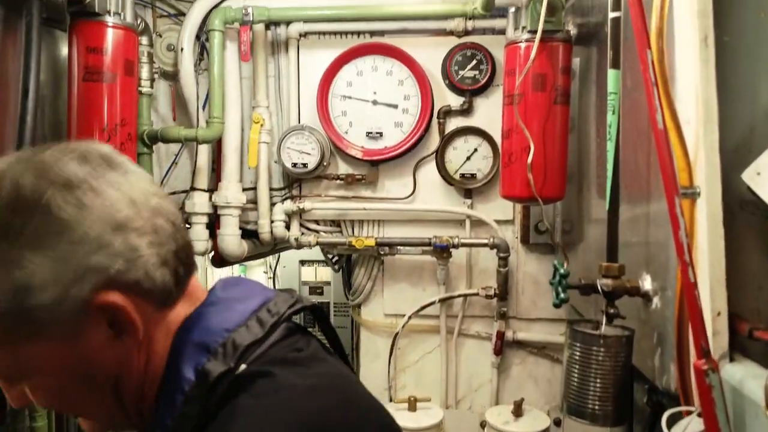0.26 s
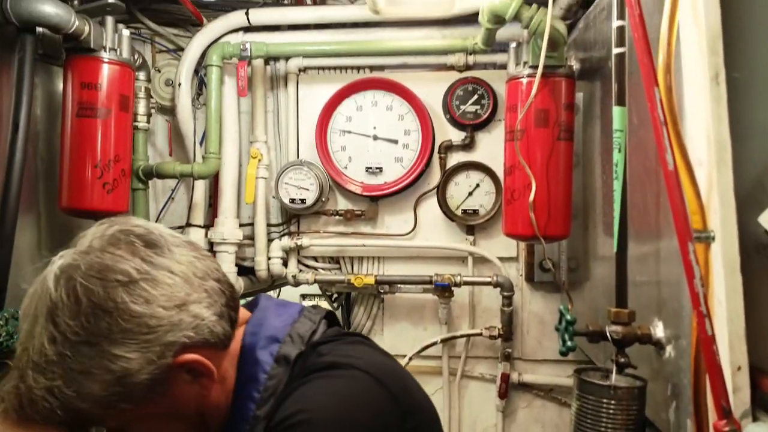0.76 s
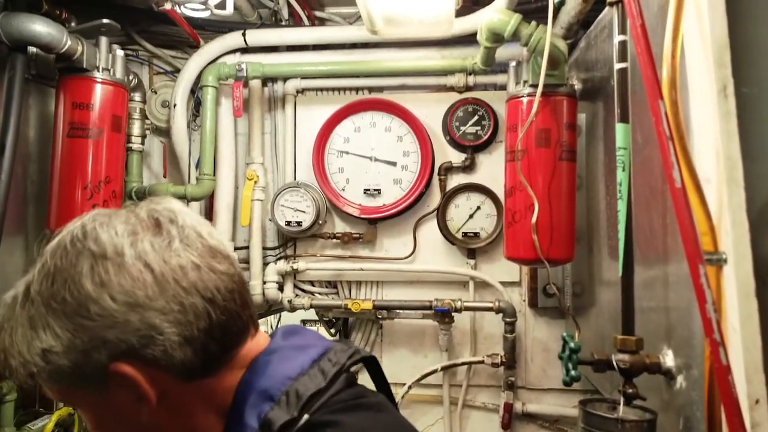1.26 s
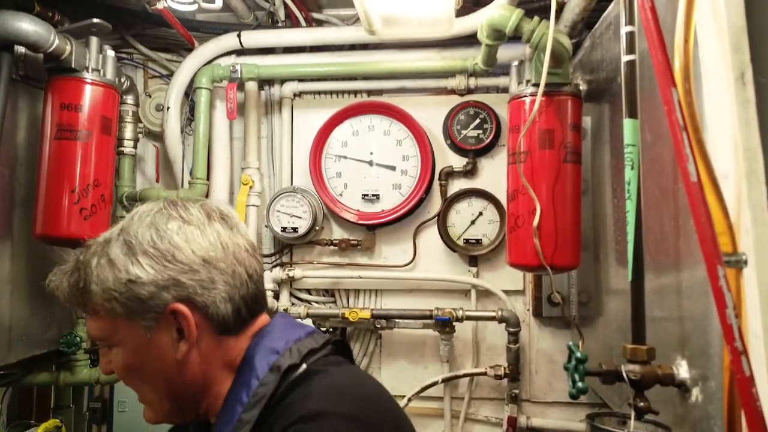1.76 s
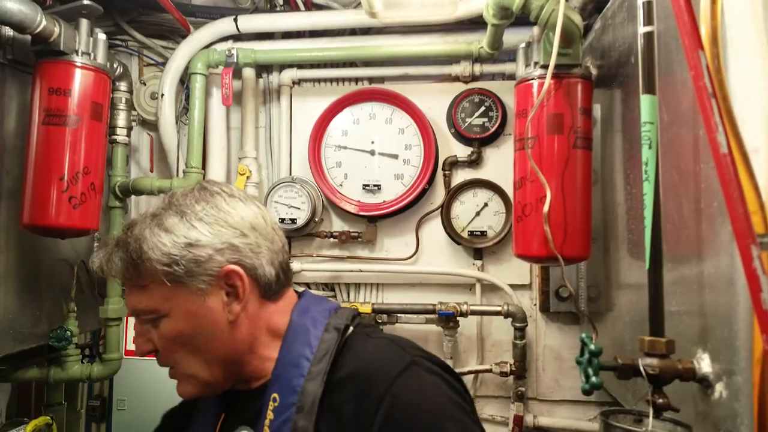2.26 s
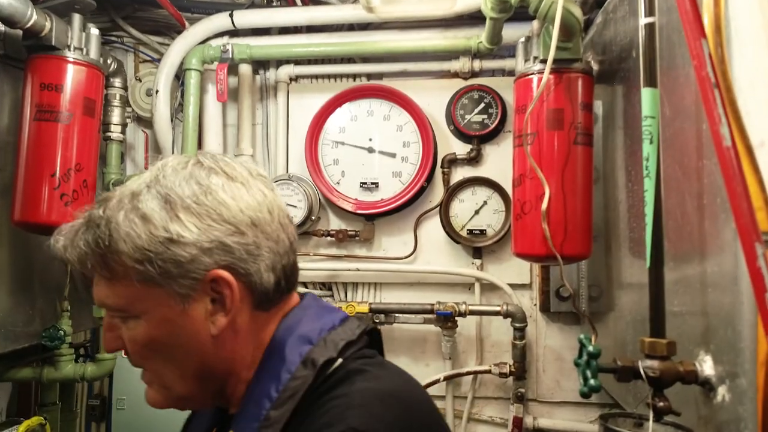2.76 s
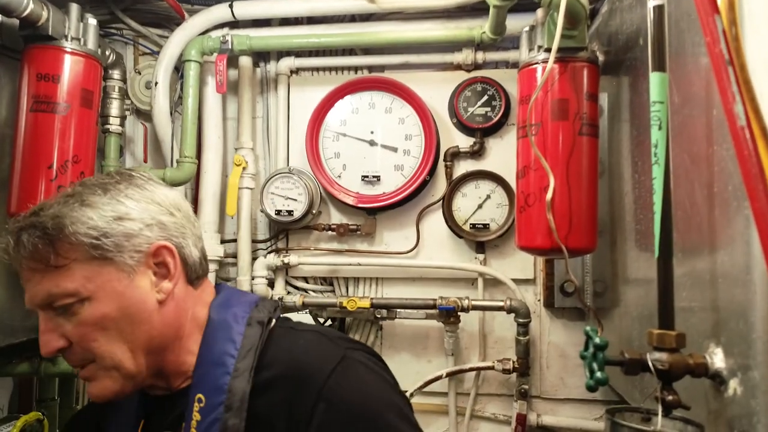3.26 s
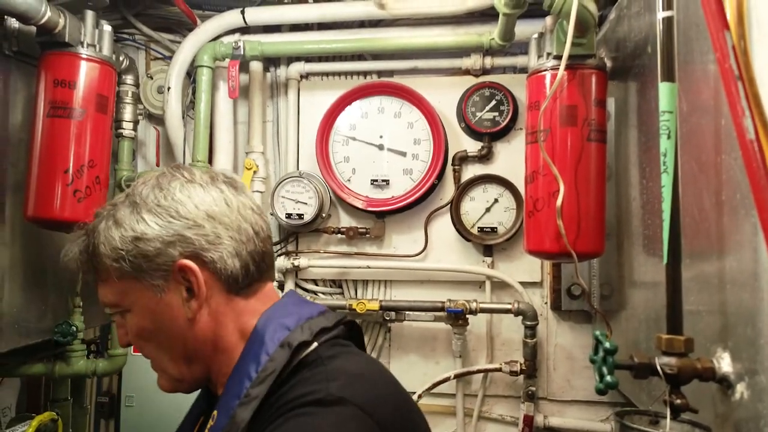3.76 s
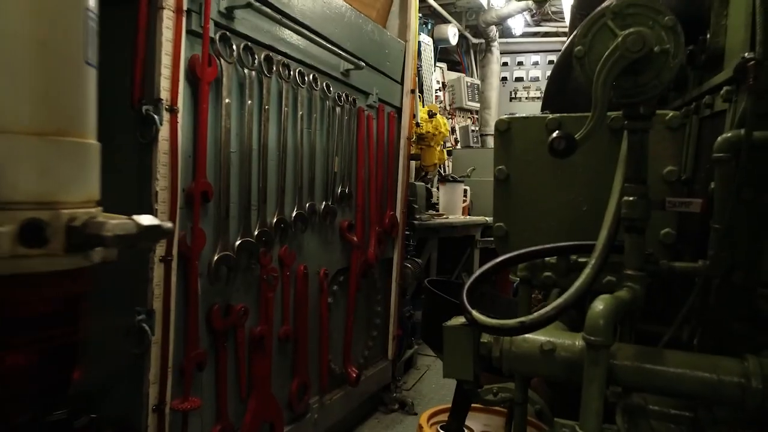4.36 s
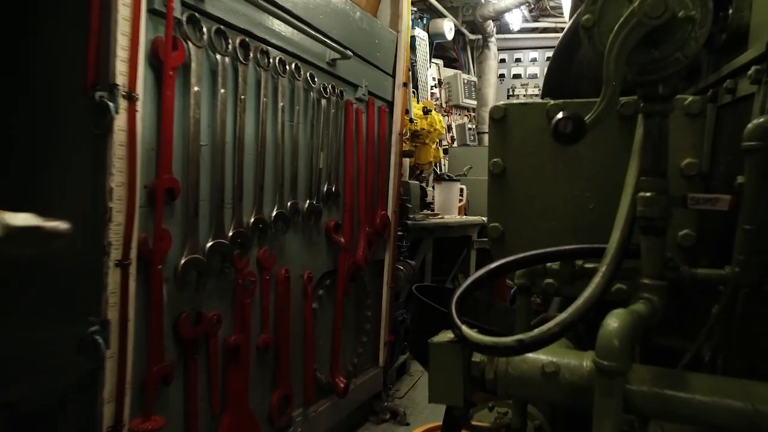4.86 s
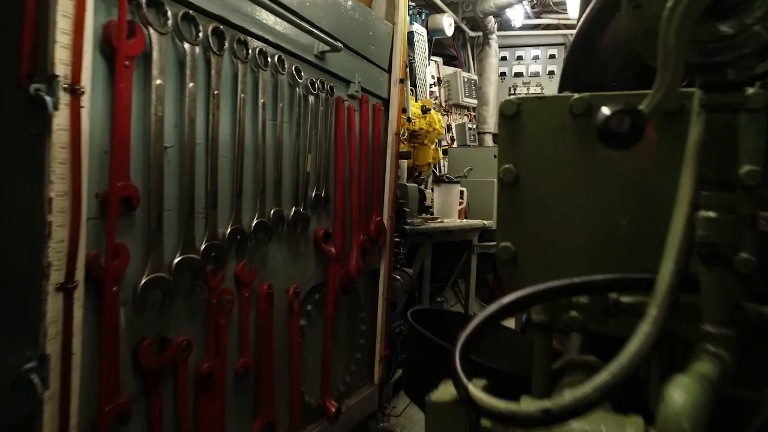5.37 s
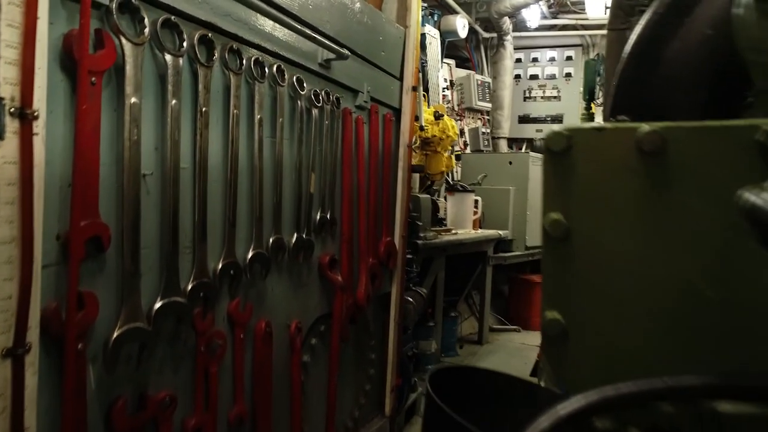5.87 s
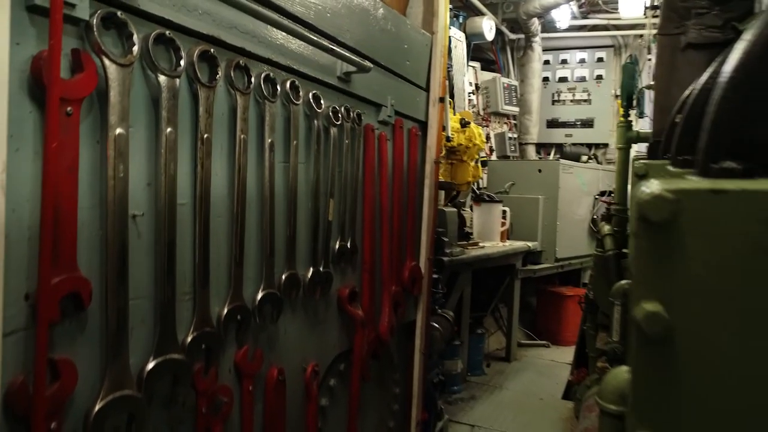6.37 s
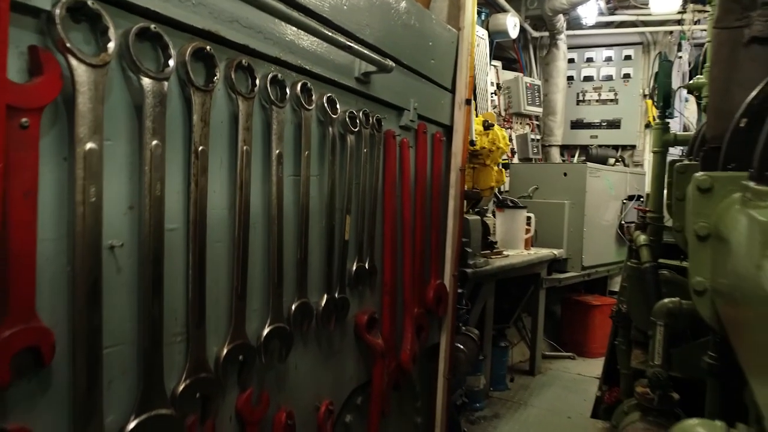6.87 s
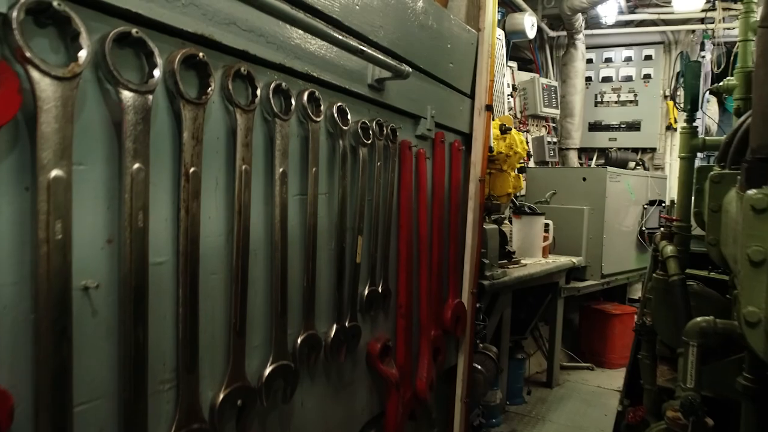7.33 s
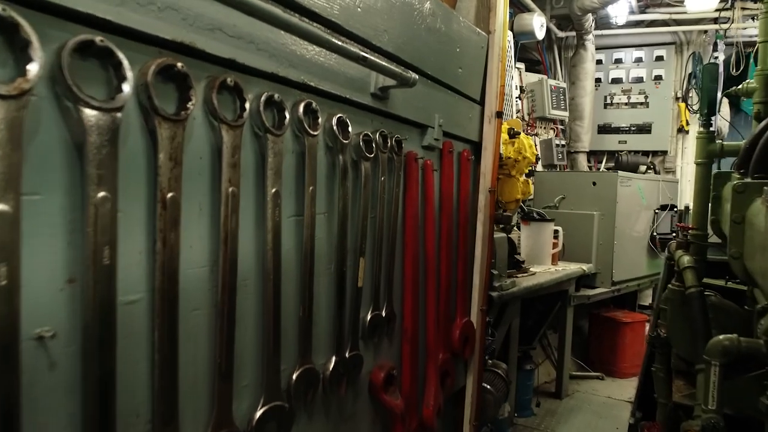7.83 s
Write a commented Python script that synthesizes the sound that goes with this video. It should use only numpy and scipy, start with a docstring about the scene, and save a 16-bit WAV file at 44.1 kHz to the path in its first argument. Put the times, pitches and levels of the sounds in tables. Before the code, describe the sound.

Continuous diesel machinery in a cramped metal room: first a deep steady hum with airy noise and a few light knocks on plating, then a one-second fade into a deeper, stronger hum. The second position adds higher whine, quick mechanical tapping and a gentle pulsing from two shafts out of step. Short, dull steel clanks land later. A single mono microphone sits among the machinery.

```python
"""A diesel set hums on four beats a turn in a boat's engine room, heard from two places, the first fading into the second.
The faster shaft comes first, then a slower, louder one with a second shaft beating against it. Each hum is a sum of tones
on multiples of the shaft speed. Gear clatter whines, and short tones tap with the valve gear at fixed shaft angles.
Air hisses throughout as shaped noise; now and then a blow rings the steel plating or a burst of noise ticks."""
import sys
import numpy as np
from scipy import signal
from scipy.fft import rfft, irfft
from scipy.io import wavfile
from scipy.ndimage import uniform_filter1d, map_coordinates

SR = 44100
rng = np.random.default_rng(int(sys.argv[2]) if len(sys.argv) > 2 else 0)


def put_to_file(sound):
    """Save the sound as 16-bit audio at rate SR, in the file named by the first command-line argument."""
    columns = np.atleast_2d(sound).T  # one column per channel
    safe = np.clip(columns, -1, 1)
    whole_steps = np.round(safe * 32767)
    wavfile.write(sys.argv[1], SR, whole_steps.astype(np.int16))


N = 357210
T = np.arange(N) / SR  # time of every sample, seconds
HZ = np.arange(N // 2 + 1) * SR / N  # frequency of every spectrum bin


def first_place():
    """The faster set: tones locked to one shaft, noise throbbing twice a turn, and hums tied to no shaft."""
    # Tones of the shaft. Each row: multiple of the shaft speed, mean level in dB rms.
    orders = [(2, -54), (3, -43), (4, -24), (5, -52), (7, -47), (8, -41), (10, -57), (12, -51), (13, -55),
              (14, -51), (15, -60), (16, -45), (17, -52), (18, -57), (19, -54), (20, -41.5), (21, -47.5),
              (22, -57), (24, -48), (25, -59), (28, -58), (29, -56), (31, -57), (46, -58), (76, -59),
              (116, -62), (121, -63), (129, -62)]
    # Wavering of the main hum. Each row: time in seconds, change in dB.
    waver = [(.2, -3), (.55, 0.5), (1, 1), (1.4, 0), (2.05, -0.5), (2.8, 2), (3.1, -2), (3.43, -2.5),
             (3.6, 0.5), (3.72, 2.5), (3.85, 6), (4.05, -4)]
    # Rumble, clatter and hiss before the room colours them. Each row: pitch in Hz, level in dB per Hz.
    noise_levels = [(20, -65), (40, -59), (56, -58), (90, -71), (170, -65.5), (215, -68.5), (280, -61),
                    (360, -70.5), (600, -69), (800, -71.5), (2000, -77), (3200, -81.5), (6200, -86),
                    (13500, -90), (16000, -92)]
    # Resonances and dips of the room. Each row: pitch in Hz, width in Hz, boost or cut in dB.
    room = [(243, 43, -6.5), (420, 55, 2.5), (610, 84, 2.5), (698, 38, 1.5), (540, 24, -1.5), (775, 34, -4),
            (875, 68, 3), (1910, 170, 2.5), (2400, 150, 3)]
    # How much of the noise repeats every turn. Each row: pitch in Hz, share of the power from 0 to 1.
    repeat = [(300, 0.17), (900, 0.02), (2500, 0.3), (4500, 0.14), (7000, 0.05)]
    # The hiss sinks a little. Each row: time in seconds, change in dB.
    hiss = [(0, 1), (1.5, 0.24), (3, 0)]
    # Wavering tones of no shaft. Each row: pitch in Hz, width in Hz, level in dB rms.
    stray_hums = [(57.3, 1.5, -42.5), (90, 4.4, -47), (215, 8.7, -50)]

    angle = shaft(turn_hz=15.472, start=-0.756, wander=0.012)
    throb = undb(3.0 * np.cos(2 * angle))
    swell = undb(0.38 * flicker(10) + in_time(hiss))
    spectrum = undb(in_pitch(noise_levels)) * bumps(room)
    noise = roar(angle, spectrum, repeat, 0.88, throb, swell, flicker_db=0.6)
    stray = sum(undb(db) * band(hz, width) for hz, width, db in stray_hums)
    hum = tones(angle, orders, in_time(waver), flutter_db=0.7, thump=2.25,
                locked=(8, 12, 16, 17, 19, 20, 21, 22, 24))
    return hum + noise + stray


def second_place():
    """The slower set, with gear whine and taps; the noise swells as its two shafts fall in and out of step."""
    # Tones of the main shaft. Each row: multiple of the shaft speed, mean level in dB rms.
    orders = [(2, -44), (4, -19.9), (6, -53), (8, -38), (9, -58), (12, -51), (14, -52), (16, -44),
              (20, -54), (21, -61), (22, -59), (24, -49), (28, -59), (30, -61), (38, -59), (40, -49),
              (52, -59), (55, -60), (60, -60), (67, -60), (68, -55), (69, -59), (70, -58), (71, -57),
              (72, -56), (76, -52.5), (85, -59), (86, -51), (90, -51), (91, -58), (92, -58), (99, -49),
              (100, -55), (102, -60), (103, -53), (104, -47.5), (107, -53), (108, -50.5), (105, -59),
              (113, -56), (114, -53), (123, -54), (126, -58), (136, -61), (143, -58), (183, -62),
              (187, -62), (188, -63)]
    # Tones of the second shaft. Each row: multiple of its speed, mean level in dB rms.
    second_orders = [(2, -51), (4, -36), (5, -41), (7, -45), (8, -54), (9, -53), (10, -61), (11, -60.5),
                     (16, -60)]
    # Wavering of the main hum. Each row: time in seconds, change in dB.
    waver = [(3.55, 1.1), (3.85, -1.3), (4.05, -0.034), (4.6, 0.39), (5.5, -0.46), (6.4, 0.0044),
             (7.1, -1.2), (7.5, -0.64), (8.1, 1.2)]
    # The shaft hunts around its mean speed. Each row: time in seconds, lead in radians.
    lead = [(4.2, -.012), (4.6, .012), (5.1, .016), (5.5, .042), (6.25, .042), (6.6, -.011), (7.8, -.07),
            (8.1, -.08)]
    # Rumble, clatter and hiss before the casing colours them. Each row: pitch in Hz, level in dB per Hz.
    noise_levels = [(20, -75), (28, -73), (55, -53), (100, -64.5), (165, -76), (220, -70.5), (330, -69.5),
                    (450, -77.5), (560, -71.5), (800, -72.5), (2000, -74), (3100, -82), (6000, -86),
                    (14000, -97.5)]
    # Resonances and dips of the casing. Each row: pitch in Hz, width in Hz, boost or cut in dB.
    casing = [(984, 184, 5), (1180, 63, 2.5), (1445, 190, 7.5), (1640, 124, 4), (2030, 100, 3.5),
              (2230, 140, -0.5), (2523, 270, 1.5)]
    # How much of the noise repeats every turn. Each row: pitch in Hz, share of the power from 0 to 1.
    repeat = [(300, .25), (700, .25), (1400, .25), (2500, .35), (4000, .1), (7000, 0)]
    # The whine grows and sinks. Each row: time in seconds, change in dB.
    whine = [(3.75, -0.5), (4, 1), (4.4, 0.6), (5, -1.07), (8.1, -1)]
    turn_hz = 13.695
    hiss_follows = 0.82  # share of the whine's dB changes that the hiss shares

    angle = shaft(turn_hz, start=-1.102, wander=0.004) + in_time(lead)
    second = shaft(turn_hz=13.076, start=-1.46, wander=0.008)
    whine_db = in_time(whine)
    swell = undb(0.45 * np.cos(4 * (angle - second)) + 0.7 * flicker(10))
    swell = swell * undb(hiss_follows * whine_db)
    # the clatter takes the rest of the whine's changes and throbs once a turn
    throb = swell * undb((1 - hiss_follows) * whine_db + 1.5 * np.cos(angle - 0.5))
    spectrum = undb(in_pitch(noise_levels)) * bumps(casing)
    noise = roar(angle, spectrum, repeat, 0.97, throb, swell, flicker_db=0.9)
    hum = tones(angle, orders, in_time(waver), flutter_db=1.28, thump=-2.2,
                locked=(99, 100, 104, 108), opposed=(103, 107), whine_db=whine_db)
    second_hum = tones(second, second_orders, 0, flutter_db=1.0)
    return hum + second_hum + noise + taps(angle, turn_hz) * undb(whine_db)


def shaft(turn_hz, start, wander):
    """Shaft angle in radians, hunting a little; start is the angle of the four-a-turn beat."""
    return 2 * np.pi * turn_hz * T + start / 4 + wander * walk(3)


def tones(angle, orders, waver_db, flutter_db, thump=0, locked=(), opposed=(), whine_db=0):
    """A tone on each multiple of the shaft; locked ones add up to one thump a turn, opposed ones cancel there."""
    out = 0
    for multiple, db in orders:
        lag = rng.uniform(0, 2 * np.pi)
        flutter = flutter_db * walk(6)
        if multiple in (2, 4):  # the beats keep step with the shaft
            lag = 0
            flutter = flutter / 3 + waver_db
        elif multiple in locked + opposed:
            lag = -multiple * thump
            if multiple > 14 and multiple not in opposed:
                lag += np.pi  # turned over above the hull's resonance
        if multiple > 80:  # gear teeth
            flutter = flutter + whine_db
        out = out + undb(db + flutter) * np.cos(multiple * angle + lag)
    return np.sqrt(2) * out  # a cosine of rms 1 peaks at the root of 2


def taps(angle, turn_hz):
    """Valve gear taps the casing at fixed shaft angles: short tones that differ a little from turn to turn."""
    # Each row: shaft angle in radians, pitch in Hz, typical peak level in dB.
    tap_rows = [(.15, 1968, -39), (.2, 970, -45), (.45, 2590, -42.5), (.75, 1820, -44), (1.6, 970, -44),
                (1.75, 2540, -50), (1.85, 1620, -43), (3.6, 1700, -44.5), (4.9, 2650, -47.5),
                (5.7, 2150, -46)]
    rise_s, scatter_db, detune = 0.003, 2, 0.01  # detune is a share of the pitch
    out = 0
    for at, hz, db in tap_rows:
        # whole turns and the part of a turn since the tap; the added turn keeps the count above zero
        turn, part = np.divmod((angle - at) / (2 * np.pi) + 1, 1)
        draws = rng.standard_normal((int(turn.max()) + 1, 2))
        size, tune = draws[turn.astype(int)].T
        age = part / turn_hz
        shape = age / rise_s * np.exp(1 - age / rise_s)
        tone = np.sin(2 * np.pi * hz * (1 + detune * tune) * age)
        out = out + undb(db + scatter_db * size) * shape * tone
    return out


def knocks():
    """Blows on the steel: each rings the plating modes near its pitch, and each mode dies at its own rate."""
    # Each row: start in seconds, ring level in dB, pitch in Hz where it rings most.
    blows = [(.179, -36, 950), (.186, -39, 860), (.355, -42.5, 2600), (.427, -28, 684), (.429, -39, 1380),
             (.433, -37, 1000), (.447, -36, 600), (0.461, -41, 1250), (.474, -40, 1000), (1.241, -40, 4700),
             (3.343, -34, 1050), (3.344, -37, 2000), (5.632, -31.5, 543), (5.634, -42, 2600),
             (5.648, -40, 1200), (5.707, -43, 1140), (5.638, -45, 5900), (5.646, -42, 5900),
             (5.654, -49, 5900), (6.632, -37, 617), (6.642, -30, 350), (6.828, -38, 2880),
             (6.837, -30.5, 1750), (6.844, -30, 695), (6.856, -35, 720), (6.845, -32, 1250),
             (6.852, -41, 2250), (6.859, -34, 1350), (6.868, -32, 1140), (7.955, -36, 1490)]
    # Modes of the plating. Each row: pitch in Hz, seconds to die away by 60 dB.
    plating = [(290, 0.1), (340, 0.12), (410, 0.057), (470, 0.099), (570, 0.11), (655, 0.061), (720, 0.12),
               (920, 0.11), (1130, 0.11), (1290, 0.081), (1390, 0.17), (1490, 0.034), (1700, .08),
               (1950, 0.067), (2280, 0.18), (2430, 0.13), (2710, 0.085), (2900, 0.14), (3250, 0.053),
               (3740, 0.07), (4220, 0.082), (5060, 0.12), (5960, 0.065)]
    spread_oct, contact_s = 0.31, 0.00078  # reach around the pitch in octaves; rise time
    out = np.zeros(N)
    hz, t60 = np.transpose(plating)[:, :, None]
    signs = rng.choice([-1, 1], (len(blows), len(plating), 1))
    for (start_s, ring_db, centre_hz), sign in zip(blows, signs):
        first = int(start_s * SR)
        age = T[:min(N - first, SR // 4)]  # a quarter of a second at most
        weight = np.exp(-(np.log2(hz / centre_hz) / spread_oct) ** 2) * sign
        modes = weight * undb(ring_db - 60 * age / t60) * np.sin(2 * np.pi * hz * age)
        out[first:first + len(age)] += modes.sum(axis=0) * np.clip(age / contact_s, 0, 1)
    return out


def ticks():
    """Wide bursts of noise: a sharp start, a hold while the part rattles, then a quick decay."""
    # Each row: start in seconds, length before the decay in seconds, held level in dB rms, pitch in Hz.
    tick_rows = [(0.18, .002, -40, 6500), (0.428, .05, -44, 1200), (0.934, .002, -39.5, 2600),
                 (1.231, .006, -34, 7100), (3.342, 0.004, -38, 6540), (3.343, .005, -40, 12000),
                 (5.634, 0.059, -36.5, 1480), (6.823, 0.026, -38.5, 1900), (6.827, .015, -47, 5000)]
    rise_s, t60_s = 0.001, 0.12  # t60 is the time to die away by 60 dB
    relative_width = 1.6  # share of the pitch
    out = 0
    for start_s, length_s, db, hz in tick_rows:
        age = T - start_s
        decay_db = -60 * np.clip(age - length_s, 0, None) / t60_s
        shape = np.clip(age / rise_s, 0, 1) * undb(db + decay_db)
        out = out + shape * band(hz, relative_width * hz)
    return out


def roar(angle, spectrum, repeat, memory, throb, swell, flicker_db):
    """Noise of the running set: part repeats and throbs each turn, part is fresh, swells and flickers by band."""
    share = in_pitch(repeat)
    white = rfft(rng.standard_normal(N))
    fresh = 0
    for hz in 31.25 * 2 ** np.arange(0, 10, 0.5):  # half-octave steps
        octaves = np.log2((HZ + 1) / hz)
        part = np.cos(np.pi * np.clip(octaves, -0.5, 0.5)) ** 2  # neighbouring bands add up to one
        depth_db = flicker_db * (2.2 if hz > 2500 else 1)  # the treble flickers more
        fresh = fresh + irfft(white * part, N) * undb(depth_db * flicker(13))
    repeating = rfft(clatter(angle, memory) * throb) * np.sqrt(share)
    passing = rfft(fresh * swell) * np.sqrt(1 - share)
    return irfft((repeating + passing) * spectrum * np.sqrt(SR / 2), N)  # the root turns dB per Hz into gain


def clatter(angle, memory, count=2048):
    """Teeth and bearings meet the same flaws every turn: noise laid round the shaft, slowly renewed."""
    turns = (angle - angle.min()) / (2 * np.pi)
    fresh = rng.standard_normal((int(turns.max()) + 42, count))  # one row a turn
    renewed = signal.lfilter([np.sqrt(1 - memory ** 2)], [1, -memory], fresh, axis=0)
    ring = renewed[40:].ravel()  # the first 40 turns only let the memory settle
    step = angle[-1] / T[-1] / (2 * np.pi) * count / SR  # noise points passed per sample
    return map_coordinates(ring, [turns * count], order=3) * np.sqrt(step)  # as strong per Hz as white noise


def band(hz, width):
    """Noise of rms 1 in a steep resonance."""
    gain = 1 / (1 + (2 * (HZ - hz) / width) ** 2)
    x = irfft(rfft(rng.standard_normal(N)) * gain, N)
    return x / x.std()


def bumps(rows):
    """Gain of resonances or dips given as (Hz, width in Hz, dB)."""
    return undb(sum(db / (1 + (2 * (HZ - hz) / width) ** 2) for hz, width, db in rows))


def walk(rate):
    """Random levels, each held 1 / rate seconds, then smoothed twice; spread near 1."""
    k = int(SR / rate)
    steps = np.repeat(rng.standard_normal(N // k + 1), k)
    return np.sqrt(2) * uniform_filter1d(uniform_filter1d(steps, k), k)[:N]


def flicker(rate):
    """A random walk that keeps its quick steps and loses its slow drift."""
    w = walk(rate)
    return w - uniform_filter1d(w, int(3 * SR / rate))


def undb(db):
    """Decibels to gain."""
    return 10 ** (np.asarray(db) / 20)


def in_time(rows):
    """Rows joined by straight lines in time."""
    return np.interp(T, *np.transpose(rows))


def in_pitch(rows):
    """Rows joined by straight lines on a log-frequency axis."""
    hz, value = np.transpose(rows)
    return np.interp(np.log(HZ + 1), np.log(hz), value)


def scene():
    """The first place fades into the second at constant power; knocks and ticks lie over both."""
    fade_start_s, fade_s = 3.2, 1.0
    turn = np.pi / 2 * np.clip((T - fade_start_s) / fade_s, 0, 1)
    engine = first_place() * np.cos(turn) + second_place() * np.sin(turn)
    return (engine + knocks() + ticks())[None]


def record(dry):
    """The microphone housing dips a few treble bands; a steep filter cuts the top."""
    # Each row: pitch in Hz, width in Hz, cut in dB.
    mic_dips = [(4940, 560, -6), (7510, 1250, -4), (10470, 240, -15)]
    top_hz = 15640
    coloured = irfft(rfft(dry) * bumps(mic_dips), N)
    low_pass = signal.ellip(12, 0.2, 80, top_hz, fs=SR, output="sos")  # 0.2 dB ripple, 80 dB cut
    return signal.sosfilt(low_pass, coloured)


dry = scene()
out = record(dry)
put_to_file(out)
```